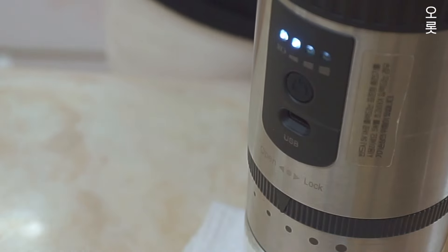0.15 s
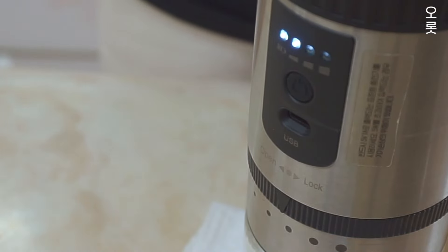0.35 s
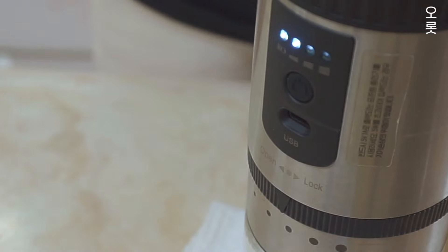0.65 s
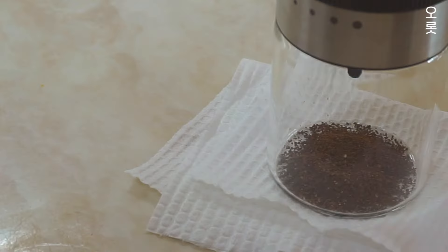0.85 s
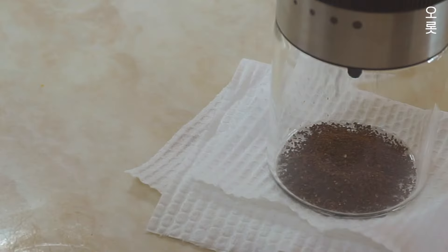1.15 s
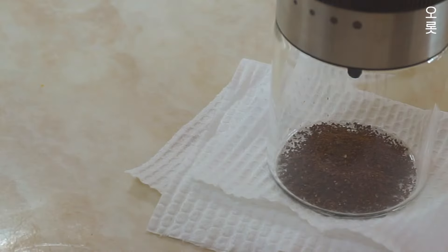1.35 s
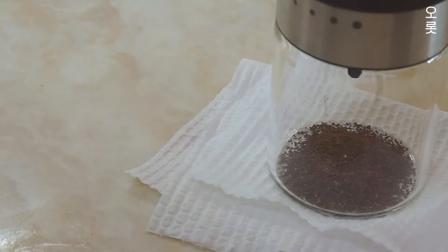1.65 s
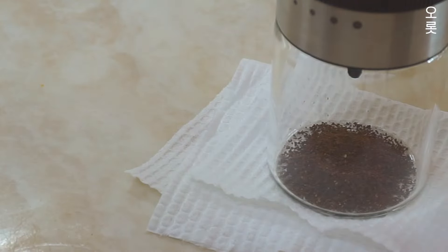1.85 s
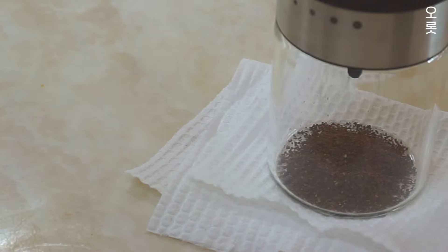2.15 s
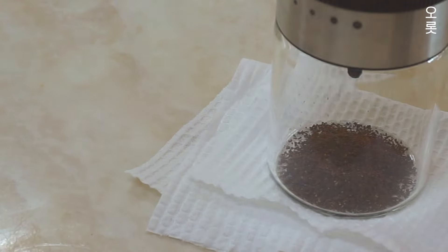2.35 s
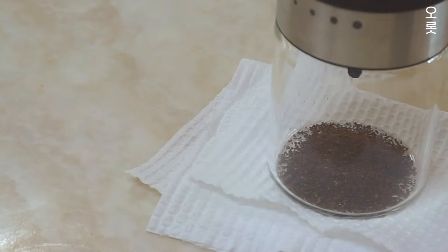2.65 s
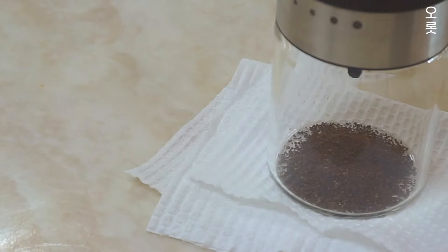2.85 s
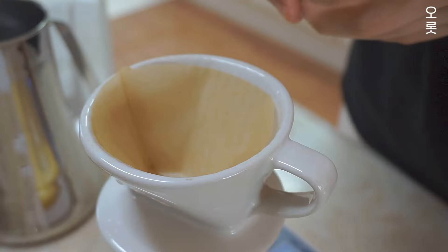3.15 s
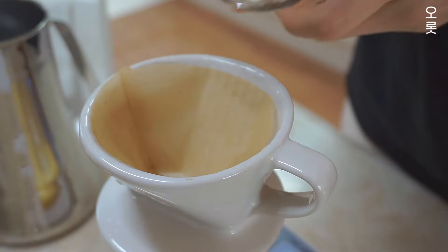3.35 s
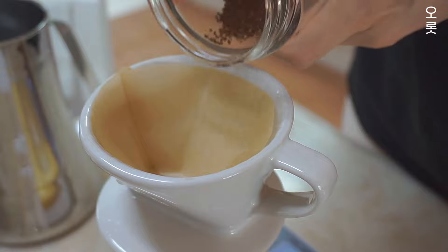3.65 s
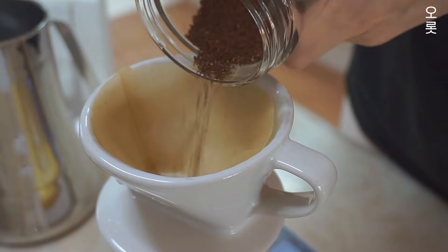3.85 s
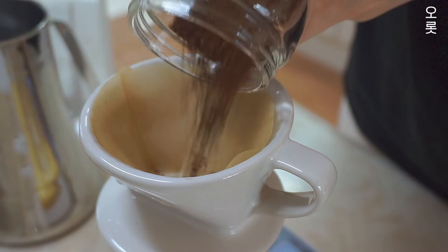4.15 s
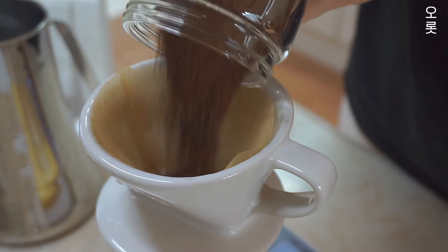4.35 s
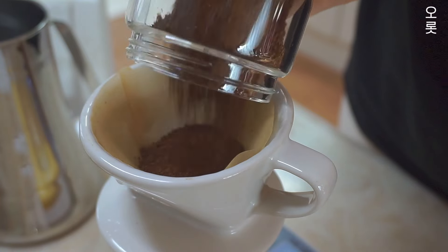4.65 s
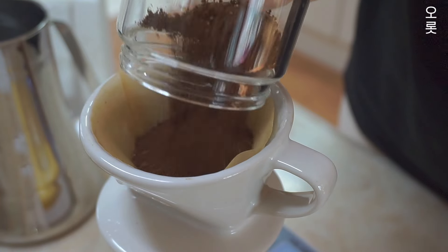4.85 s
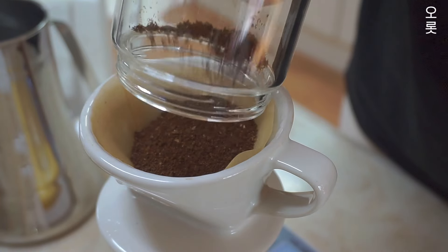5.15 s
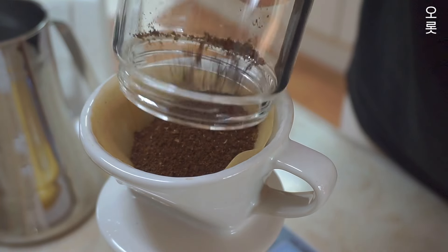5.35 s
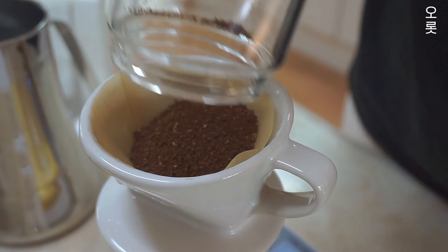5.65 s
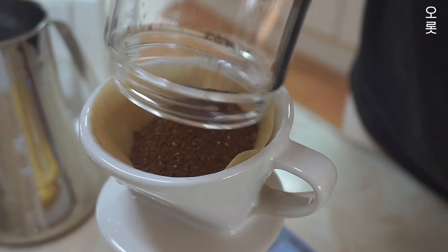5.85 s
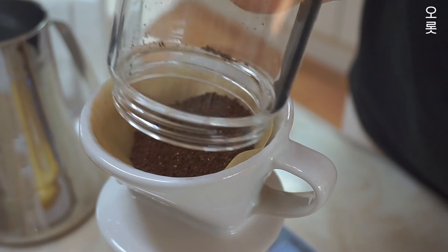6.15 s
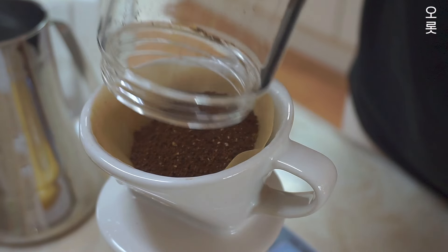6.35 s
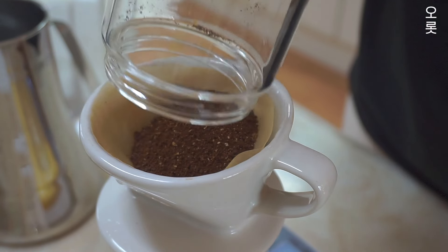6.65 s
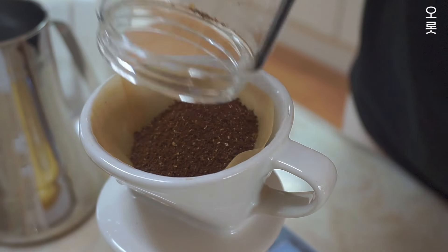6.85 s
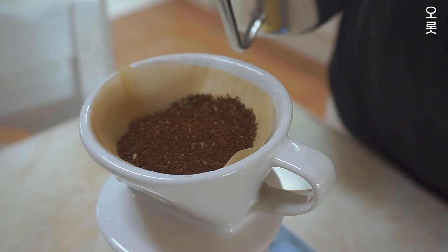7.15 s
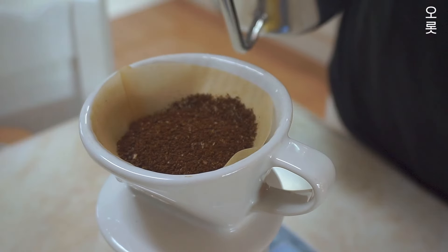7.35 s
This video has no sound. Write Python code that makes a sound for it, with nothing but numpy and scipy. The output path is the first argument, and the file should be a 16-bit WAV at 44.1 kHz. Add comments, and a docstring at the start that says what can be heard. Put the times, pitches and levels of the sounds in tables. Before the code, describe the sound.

An electric coffee grinder whines and crunches, cuts off, then grounds slide into a paper filter and fingers tap a glass jar.

```python
"""A quiet kitchen, a two-port microphone close to a small electric burr grinder. The motor whines, the
burrs crunch and split beans, grounds hiss against the glass jar, and the sound is cut off sharply.
Over the room tone the grounds then slide from the jar into a paper filter, grain ticking on paper and
heap. Fingers tap the jar empty, first on its base, then on its wall, ringing the glass and the air
inside; the table top and the kitchen walls answer each tap."""
import sys
import numpy as np
from scipy import signal
from scipy.fft import rfft, irfft, next_fast_len
from scipy.io import wavfile
from scipy.ndimage import uniform_filter1d, map_coordinates

SR = 44100
rng = np.random.default_rng(int(sys.argv[2]) if len(sys.argv) > 2 else 0)


def to_wav(s):
    """Save 16-bit WAV."""
    ch = np.atleast_2d(s).T  # columns
    pcm = np.round(np.clip(ch, -1, 1) * 32767)  # PCM
    wavfile.write(sys.argv[1], SR, pcm.astype(np.int16))


N = 330743
TIME = np.arange(N) / SR
GRINDER_CUT_S, JAR_CUT_S = 3.032, 7.052


def amp(db):
    return 10 ** (np.asarray(db) / 20)


def unit(x):
    return x / np.sqrt(np.mean(x ** 2) + 1e-20)


def along(points, hz):
    """Read (Hz, value) points on a log axis."""
    f, v = np.transpose(points)
    return np.interp(np.log(hz + 1), np.log(f + 1), v)


def curves(rows, outside=None):
    """One value per sample for each column after the time."""
    s, *columns = np.transpose(rows)
    return [np.interp(TIME, s, column, outside, outside) for column in columns]


def wobble(rate):
    """A smooth random curve, rate knots a second."""
    return map_coordinates(rng.standard_normal(int(N * rate / SR) + 4), [TIME * rate])


def filtered(x, response):
    """Apply a complex frequency response."""
    m = next_fast_len(N + SR // 2)
    return irfft(rfft(x, m) * response(np.fft.rfftfreq(m, 1 / SR)), m)[..., :N]


def gritty(spectrum, rate, spread_db):
    """Coloured noise of rms 1 whose level jumps rate times a second."""
    noise = rng.standard_normal(N) * amp(spread_db * wobble(rate))
    return unit(filtered(noise, lambda hz: amp(along(spectrum, hz))))


def resonance(hz, width):
    """Response of one damped mode."""
    return lambda f: 1j * f * width / (hz * hz - f * f + 1j * f * width)


def ring(hz, t60, size):
    """A damped sine."""
    t = np.arange(size) / SR
    return amp(-60 * t / t60) * np.sin(2 * np.pi * hz * t)


def snaps(rows, cycles, noise_db, low_hz, high_hz, size):
    """Band-limited bursts of tone and noise, one per (s, dB, Hz) row, 60 dB down after cycles."""
    tone, puff = np.zeros((2, N + size))
    t = np.arange(size) / SR
    for s, db, hz in rows:
        tone[round(s * SR):][:size] += amp(db) * ring(hz, cycles / hz, size) * np.minimum(1, t * hz)
        puff[round(s * SR):][:size] += amp(db + noise_db - 60 * t * hz / cycles)
    band = lambda f: (1j * f / (low_hz + 1j * f)) ** 3 * (high_hz / (high_hz + 1j * f)) ** 2
    return filtered(tone[:N] + puff[:N] * rng.standard_normal(N), band)


def ports(x, balance, phase):
    """A near source reaches the two microphone ports at different levels and phases."""
    split = lambda points, hz: np.outer([.5, -.5], along(points, hz))
    return filtered(x, lambda hz: amp(split(balance, hz)) * np.exp(1j * split(phase, hz)))


# Kitchen air: f/Hz, level/dB
ROOM_SPECTRUM = [(15, -54), (25, -23), (112, -10.5), (145, -13), (182, -4), (353, -9), (412, -9),
                 (444, -10), (480, -2), (531, -7.5), (1140, -16.5), (1850, -19), (4510, -25), (11000, -30),
                 (14300, -69)]
# Its likeness at the two ports: f/Hz, correlation
ROOM_LIKENESS = [(60, 0.86), (170, 0.64), (490, -0.16), (1410, -0.4), (4050, 0.021), (11600, 0.62)]
def room_tone():
    """Steady kitchen air under everything, only partly alike at the two ports."""
    angle = lambda hz: np.arccos(np.clip(along(ROOM_LIKENESS, hz), -1, 1)) / 2
    colour = lambda hz: amp(along(ROOM_SPECTRUM, hz)) * [np.cos(angle(hz)), np.sin(angle(hz))]
    mid, side = filtered(rng.standard_normal((2, N)), colour)
    return amp(-63 + .8 * wobble(3)) * np.array([mid + side, mid - side]) / np.std(mid)


# Motor shaft, close up: t/s, f/Hz, first order level/dB, third order level/dB
SHAFT = [(0.0, 249.4, -49, -37), (0.09, 247, -51.5, -33), (0.43, 245.9, -50, -32), (0.54, 247.6, -53, -33),
         (0.58, 253.3, -55, -43), (0.84, 247.8, -54.5, -40), (0.88, 251.8, -45, -43.5),
         (1.15, 246, -46.5, -34), (1.23, 252.4, -45.5, -36), (1.58, 251.8, -47.5, -45.5),
         (1.73, 245.7, -48.5, -33.5), (1.85, 249.2, -47, -41.5), (2.0, 251.2, -50.5, -31),
         (2.14, 249.5, -45.5, -63), (2.46, 250.5, -52.5, -41), (2.66, 244.7, -50, -32),
         (2.8, 251.1, -53, -38.5), (3.03, 245, -47.5, -35)]
# Upper orders singing out: t/s, length/s, order, level/dB
FLARES = [(0.046, 0.13, 7.5, -40.5), (.45, 0.31, 7.5, -40.5), (.5, .22, 6, -44), (0.58, 0.17, 4, -38),
          (2.004, 0.31, 7.5, -52), (2.4, .2, 6, -47), (2.88, .14, 7.5, -44)]
def motor(quiet_db=-45.5, fade_s=0.058):
    """The whine of unsteady shaft orders, and the swell of the load once a turn."""
    shaft_hz, first_db, third_db = curves(SHAFT)
    turn = 2 * np.pi * np.cumsum(shaft_hz) / SR
    whine = amp(first_db + 1.5 * wobble(12)) * np.sin(turn)
    whine += amp(third_db + 1.5 * wobble(30)) * np.sin(3 * turn + .3 * wobble(25))
    for order in (4, 6, 7.5):
        flare = sum(amp(db) * np.clip(np.minimum(TIME - s, s + length - TIME) / fade_s + 1, 0, 1)
                    for s, length, k, db in FLARES if k == order)
        level = (amp(quiet_db) + flare) * amp(2.5 * wobble(25))
        whine += level * np.sin(order * turn + 2.1 * wobble(50))
    return np.sqrt(2) * whine, 1 + 0.099 * np.cos(turn)


# Beans splitting: t/s, level/dB, f/Hz, fragment level/dB over the crunch
CRACKS = [(0.0, -3, 1380, 3.5), (0.109, -5.5, 1450, 9), (0.153, -7, 1370, -9), (0.208, -5, 2580, -28),
          (0.226, -10, 1000, -27), (0.28, -7.5, 1450, -9), (0.37, -10, 1380, -6), (0.897, -6, 1380, -17),
          (0.928, -7, 2780, -18.5), (1.093, -10, 1420, 7.5), (1.14, -6, 1300, -11), (1.282, -9, 875, -10),
          (1.409, -7, 1199, 8), (1.439, 1, 1390, -11), (1.573, -8.5, 1271, -1), (1.691, -1.5, 867, 7.5),
          (1.775, -10.5, 1380, -0.5), (1.79, -13.5, 1600, -3.5), (1.905, -8.5, 1360, -7.5),
          (1.977, -13, 1140, -17), (2.075, -5.5, 1212, -4.5), (2.294, -4.5, 1284, 5.5),
          (2.363, -8.5, 1087, -10), (2.391, -6.5, 1500, -6), (2.47, -13.5, 1520, 1),
          (2.576, -3.5, 1215, -2.5), (2.614, -1, 1281, -9), (2.954, -16, 1848, -7)]
def beans(chip_count=60, grind_s=0.015):
    """Cracks among smaller random chips, and the load on the burrs as fragments grind away."""
    s, db, hz, fragment_db = np.transpose(CRACKS)
    age = TIME - s[:, None]
    load = amp(fragment_db) @ (np.clip(age / 0.0034, 0, 1) * np.exp(-np.abs(age) / grind_s))
    when, strength, octave = rng.random((3, chip_count))
    chips = np.transpose([when * GRINDER_CUT_S, -25 + 7 * strength, 900 * 2 ** octave])
    breaks = np.vstack([np.transpose([s, db, hz]), chips])
    return snaps(breaks, cycles=14, noise_db=-5, low_hz=550, high_hz=3200, size=1500), load


# Burrs, close up: f/Hz, level/dB
CRUNCH = [(35, -62), (60, -35.5), (210, -27), (244, -11.5), (285, -21), (477, -17.5), (683, -7), (744, 1),
          (797, -3), (1240, 1.5), (2080, -6.5), (2830, -6.5), (3600, -11.5), (4680, -38), (7920, -120)]
def burrs(load):
    """A rough crunch that surges with the fragments of each split bean."""
    return amp(-30.5 + .8 * wobble(12)) * (1 + load) * gritty(CRUNCH, 300, spread_db=3)


# Microphone beside the steel body: f/Hz, level/dB
HISS_AT_BODY = [(1290, -53), (2200, -14), (2640, 0), (3410, -6), (4970, -1.5), (6120, -3.5), (7750, 0),
                (9420, -7), (10400, -3.5), (11000, -7), (14300, -63)]
# Microphone beside the jar: f/Hz, level/dB
HISS_AT_JAR = [(1290, -33.5), (2200, -25.5), (2820, -5.5), (3410, -9.5), (4370, -3), (5840, -6),
               (6460, -1.5), (7860, -3), (10100, -10.5), (11000, -14), (14300, -56)]
def hiss(load, move_s=0.852):
    """Grinding hiss that partly follows the load, heard beside the body, then beside the jar."""
    at_body = amp(-31.5) * gritty(HISS_AT_BODY, 480, spread_db=1.5)
    at_jar = amp(-30.5) * gritty(HISS_AT_JAR, 400, spread_db=1.5)
    return np.where(TIME < move_s, at_body, at_jar) * amp(.6 * wobble(9)) * (1 + 0.17 * load)


# The jar under the burrs: t/s, level/dB
RASP = [(0, -64), (.82, -62), (.87, -38), (1.24, -40), (1.33, -46), (1.4, -36.5), (1.72, -36.5),
        (1.78, -61), (2.0, -44), (2.2, -40.5), (2.45, -41.5), (2.68, -38), (2.73, -50), (3.03, -42)]
def jar_rasp():
    """Grounds hit the glass in clumps and drive two close modes."""
    pelting = amp(6 * wobble(350)) * rng.standard_normal(N)
    modes = lambda f: resonance(2790, 150)(f) - resonance(2890, 140)(f)
    return amp(curves(RASP)[0]) * unit(filtered(pelting, modes))


# Casing panels: f/Hz, width/Hz, level/dB
PANELS = [(575, 41, -51.5), (2230, 55, -52), (3720, 130, -48.5), (4280, 80, -52.5), (4500, 135, -49.5),
          (5370, 130, -49.5)]
def casing():
    """Each shaken panel resonates at a level that wavers by chance."""
    return sum(amp(db + 1.6 * wobble(9)) * unit(filtered(rng.standard_normal(N), resonance(hz, width)))
               for hz, width, db in PANELS)


# Kitchen reverberation: f/Hz, t60/s
KITCHEN_DECAY = [(200, 0.22), (650, 0.37), (1200, 0.49), (3000, 0.43), (4500, 0.35), (8000, 0.32)]
def kitchen(x):
    """A fresh stereo answer of the room to x; each frequency dies at its own speed."""
    hz, t, noise = signal.stft(rng.standard_normal((2, SR // 2)), SR, nperseg=256)
    tail = signal.istft(noise * amp(-60 * t / along(KITCHEN_DECAY, hz)[:, None]), SR, nperseg=256)[1]
    delayed = np.pad(tail / np.linalg.norm(tail[0]), ((0, 0), (250, 0)))
    return signal.fftconvolve(x[None], delayed, axes=1)


# The grinder rocks on the table: t/s, level/dB, f/Hz
BUMPS = [(1.29, -47.5, 81.7), (2.35, -57, 70)]
# Grinder at the microphone: f/Hz, left over right level/dB
GRINDER_BALANCE = [(60, 1), (170, 2), (490, -3), (1410, -3.5), (4050, -5), (11600, -6)]
# The same path: f/Hz, left lead/rad
GRINDER_PHASE = [(0, -2), (1030, 1.19), (2580, 1.03), (3360, 1.5), (4130, 0.58), (5430, 0.65), (6550, 0.19),
                 (11800, 0.37)]
def grinder():
    """The whole machine, close to the microphone; all but the whine also sounds in the room."""
    whine, swell = motor()
    cracks, load = beans()
    bumps = snaps(BUMPS, cycles=31, noise_db=-39, low_hz=30, high_hz=400, size=SR // 3)
    mill = cracks + swell * (burrs(load) + hiss(load)) + jar_rasp() + casing() + bumps
    return ports(whine + mill, GRINDER_BALANCE, GRINDER_PHASE) + amp(-5.5) * kitchen(mill)[:, :N]


# Soft rustles near the microphone: t/s, hold/s, level/dB
RUSTLES = [(3.009, 0.15, -66), (4.698, 0.17, -62.5)]
def rustle(rise_s=0.013, fall_db_per_s=70):
    """Faint noise that comes in quickly, holds and fades."""
    level = sum(amp(db - fall_db_per_s * np.maximum(TIME - s - hold, 0))
                * np.clip((TIME - s) / rise_s, 0, 1) for s, hold, db in RUSTLES)
    spectrum = [(900, -35), (1700, -8), (2200, -6), (3200, -22), (8000, -24)]
    return level * gritty(spectrum, 60, spread_db=1.2)


# Grounds landing in the filter: t/s, level/dB on the heap, level/dB on bare paper
FLOW = [(3.8, -90, -90), (3.862, -68, -68), (3.974, -76, -76), (4.26, -78, -78), (4.3, -67, -62),
        (4.365, -51.5, -58), (4.42, -51, -55), (4.47, -54.5, -62), (4.54, -56, -64), (4.6, -66, -68),
        (4.67, -63.5, -70)]
# Colour of the heap: f/Hz, level/dB
HEAP = [(530, -44), (900, -22), (1700, -10), (2050, -1.5), (2360, -11), (2700, -5.5), (3500, -10),
        (4500, -25.5), (8000, -57.5)]
# Colour of bare paper: f/Hz, level/dB
PAPER = [(900, -49.5), (2500, -18), (4300, -10), (5250, -0.5), (6100, -15), (7000, -8), (8500, -14),
         (11000, -11), (22000, -120)]
# Where grains ring: three f/Hz on the heap, three on paper
GRAIN_HZ = (2070, 2580, 3470), (4580, 5250, 7400)
# Single grains on paper: t/s, level/dB, f/Hz
TICKS = [(3.8631, -50.5, 5600), (4.2816, -57, 5170), (4.3067, -40.5, 5270), (4.339, -46, 5320),
         (4.3629, -38, 2100), (4.4017, -41, 2730), (4.418, -41, 2900), (4.534, -40, 1920)]
def pour(grain_count=300):
    """Grit and ringing grains land, bright on paper, duller on the heap; the largest tick alone."""
    grounds = snaps(TICKS, cycles=35, noise_db=-12, low_hz=1200, high_hz=14900, size=1200)
    for flow_db, colour, rings_hz in zip(curves(FLOW, outside=-120), (HEAP, PAPER), GRAIN_HZ):
        s = rng.uniform(FLOW[0][0], FLOW[-1][0], grain_count)
        hz = rng.choice(rings_hz, grain_count) * rng.uniform(.97, 1.03, grain_count)
        db = flow_db[(s * SR).astype(int)] + along(colour, hz) + rng.uniform(2, 9, grain_count)
        grounds += snaps(zip(s, db, hz), cycles=42, noise_db=-12, low_hz=694, high_hz=15030, size=1200)
        grounds += amp(flow_db - 6) * gritty(colour, 160, spread_db=3)
    return grounds


# Jar modes: f/Hz, level/dB struck on the base, level/dB struck on the wall, t60/s
GLASS_MODES = [(4220, 4.5, -47, 0.0085), (4316, 6, -45, 0.0084), (4550, 6.5, -24, 0.0077),
               (2827, -38.5, 2, 0.045), (2765, -59, -20.5, 0.27), (2500, -52, -9, 0.0087),
               (5470, -16, -32, 0.0056), (5940, -17, -22, 0.0099), (8000, 12.5, 4, 0.0041),
               (8060, 12, -10, 0.0075), (8670, 5, -13, 0.0072), (6520, -18, 1.5, 0.016),
               (7150, -31, 1, 0.01), (7870, -20, -14, 0.028), (9440, -10, -8, 0.013),
               (10170, -20, -6.5, 0.014)]
def glass(on_wall, hardness_db, size):
    """The jar rings, its high modes set by the blow's hardness; the gripping hand makes it flutter."""
    modes = 0
    for hz, base_db, wall_db, t60 in GLASS_MODES:
        depth = min(.4, .006 / t60)  # most where the hand damps most
        flutter = 1 + depth * unit(uniform_filter1d(rng.standard_normal(size), size=40))
        db = (wall_db if on_wall else base_db) + hardness_db * (hz > 6000) + rng.normal(0, 1.3)
        modes += amp(db) * flutter * ring(hz * rng.normal(1, .002), t60, size)
    return modes * (1 - np.exp(-np.arange(size) / SR / .0014)) ** 2  # the finger pad loads the glass


# Air in the jar, then the hand on it: t60/s, swell/s
HOLLOW_TIMES = [(0.058, 0.0017), (0.018, 0.00095)]
def hollow_knock(levels_db, pitches_hz, size):
    """The air note of the jar and the thud of the hand swell and die away."""
    t = np.arange(size) / SR
    return sum(amp(db + wobble(52)[:size]) * ring(hz, t60, size) * (1 - np.exp(-t / swell))
               for db, hz, (t60, swell) in zip(levels_db, pitches_hz, HOLLOW_TIMES))


def all_round(x):
    """A short pulse with the spectrum of x evened out, as the jar sends it in all directions."""
    power = uniform_filter1d(np.abs(rfft(x)) ** 2, size=120)
    return np.roll(irfft(np.sqrt(np.abs(power)), len(x)), 128)


# Fingers on the jar: t/s, glass level/dB, hardness/dB, then level/dB, f/Hz each for air, thud and slap
TAPS = [(4.5055, -43.5, -13, -51.5, 653, -65, 390, -70, 2000),
        (4.6916, -14, -18, -34.5, 631, -40, 370, -45, 2050),
        (4.8672, -16.5, -15, -28.5, 635, -27, 347, -69, 1970),
        (5.0413, -11.5, -12, -34, 659, -26.5, 307, -64, 1160),
        (5.2172, -10.5, -11, -25.5, 662, -25, 312, -46.5, 1110),
        (5.3917, -11.5, -8.5, -17, 650, -22.5, 388, -49, 1470),
        (5.6428, -37.5, 6.5, -44.5, 682, -25, 380, -50, 1040),
        (5.8147, -26, 0, -38.5, 675, -35, 300, -42.5, 1930),
        (5.9824, -41.5, 11, -35.5, 649, -38, 428, -38, 1140),
        (6.1653, -28, 0.5, -30.5, 658, -25.5, 445, -31.5, 1440),
        (6.3402, -17.5, -5, -52, 700, -41, 330, -27, 1280),
        (6.5196, -22.5, -0.5, -52, 600, -35, 338, -31, 1340),
        (6.6881, -29.5, 4, -36, 717, -28, 333, -32.5, 895),
        (6.8464, -16.5, -3, -33, 727, -25, 366, -27.5, 2040)]
# Skin on glass: f/Hz, level/dB
SLAP_SPECTRUM = [(71, -52.5), (140, -6.5), (387, -6.5), (555, -0.5), (648, -5.5), (960, -9), (1400, -0.5),
                 (1840, -8), (2200, -11.5), (2600, -2.5), (3380, -62), (5720, -120)]
# What the kitchen walls return of a tap: f/Hz, level/dB
WALL_RETURN = [(300, -2.5), (700, -3), (1200, -4), (2000, -3), (4500, -7.5), (8000, -7.5)]
def taps(base_taps=6, size=SR // 3):
    """Each tap rings the glass, the air in the jar and the hand; table and kitchen answer."""
    near, far = np.zeros(N + SR), np.zeros((2, N + SR))
    t = np.arange(size) / SR
    rise = 1 - np.exp(-(t / 0.0011) ** 2)
    skin = gritty(SLAP_SPECTRUM, 200, spread_db=1.5)
    for k, (s, db, hardness_db, air_db, air_hz, thud_db, thud_hz, slap_db, slap_hz) in enumerate(TAPS):
        at, on_wall = round(s * SR), k >= base_taps
        hollow = hollow_knock((air_db, thud_db), (air_hz, thud_hz), size)
        smack = amp(-60 * t / 0.016) * skin[at - size:at]
        slap = amp(slap_db) * (smack / np.std(smack[:SR // 100]) + 7 * ring(slap_hz, 0.0056, size))
        click = amp(db + hardness_db + 13.5 - 60 * t / 0.003) * np.diff(rng.standard_normal(size + 1))
        clink = amp(db) * glass(on_wall, hardness_db, size)
        hit = clink + hollow + (slap + click) * rise
        lasting = on_wall * clink  # the jar wall's ring outlasts the blow
        to_room = lasting + amp(-5) * hollow + all_round(hit - hollow - lasting)
        near[at:][:size] += hit
        near[at + 265:][:size] += amp(-10) * hit  # off the table top, 6 ms later
        far[:, at:][:, :SR // 2] += kitchen(to_room)[:, :SR // 2]
    near = filtered(near[:N], lambda hz: (1j * hz / (70 + 1j * hz)) ** 2)
    return near + filtered(far[:, :N], lambda hz: amp(along(WALL_RETURN, hz)))


# Between the base taps and the wall taps: t/s, level/dB, f/Hz
SCUFFS = [(5.555, -45, 447), (5.58, -40, 417), (5.608, -41, 400)]
def scuffs():
    """Soft, low scuffs close by."""
    return snaps(SCUFFS, cycles=31, noise_db=-18, low_hz=200, high_hz=894, size=SR // 10)


# Jar at the microphone: f/Hz, left over right level/dB
JAR_BALANCE = [(60, 0), (220, 0.5), (830, -1.5), (3110, -6), (11600, -4)]
# The same path: f/Hz, left lead/rad
JAR_PHASE = [(0, -1.2), (1290, 1.04), (2840, 1.33), (4480, -0.2), (9040, 0.05), (10300, -1.6),
             (11800, -0.39)]
def emptying_jar():
    """The jar is emptied near the microphone, a little to the right."""
    return ports(rustle() + pour() + taps() + scuffs(), JAR_BALANCE, JAR_PHASE)


def scene():
    """Grinding, then emptying, over the room tone."""
    return room_tone() + grinder() * (TIME < GRINDER_CUT_S) + emptying_jar() * (TIME < JAR_CUT_S)


def record(dry):
    """The microphone chain thins the deep bass and keeps nothing above its band limit."""
    low_hz, top_hz = 40, 11060
    return filtered(dry, lambda hz: 1j * hz / (low_hz + 1j * hz) / (1 + (hz / top_hz) ** 160))


dry = scene()
out = record(dry)
to_wav(out)
```